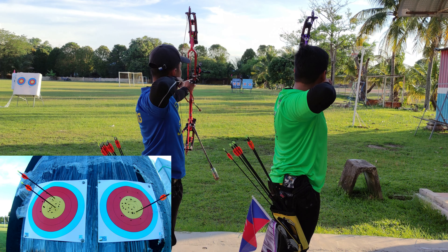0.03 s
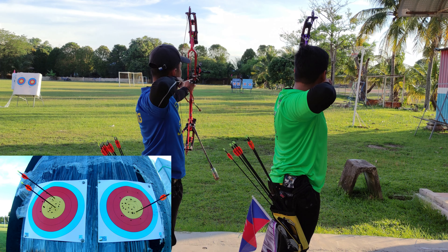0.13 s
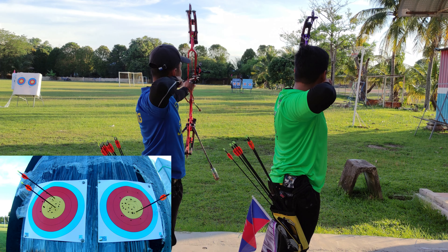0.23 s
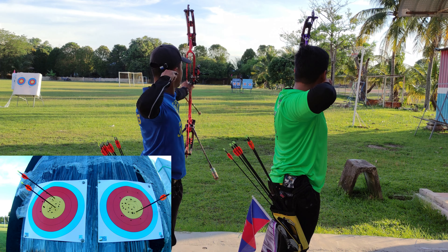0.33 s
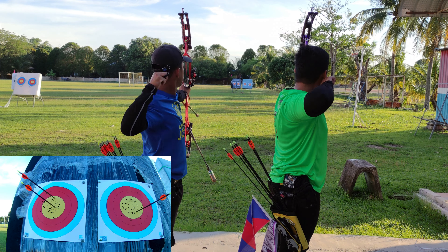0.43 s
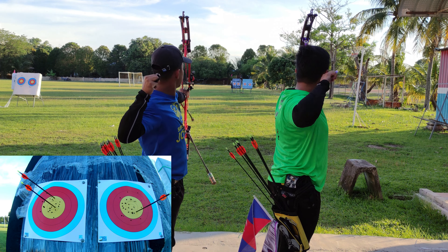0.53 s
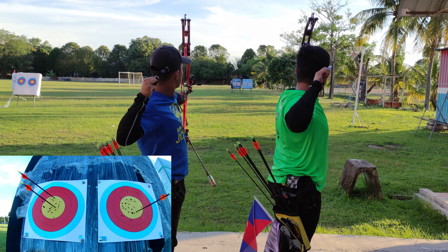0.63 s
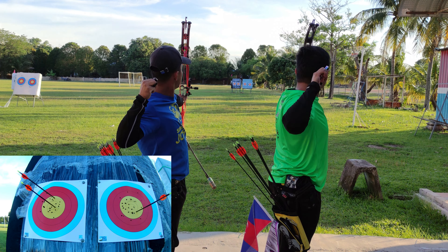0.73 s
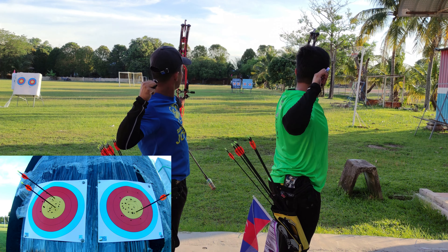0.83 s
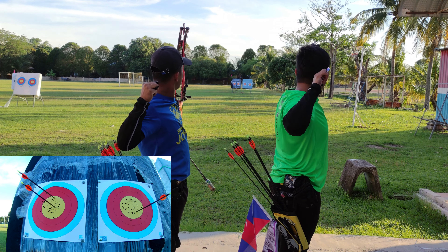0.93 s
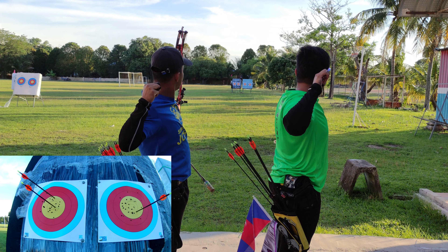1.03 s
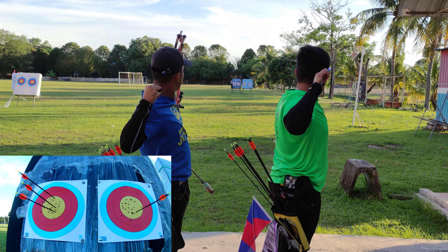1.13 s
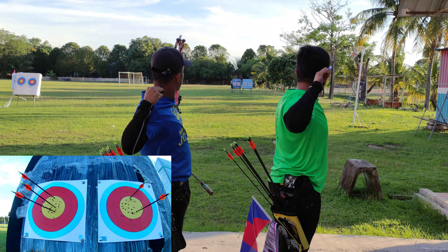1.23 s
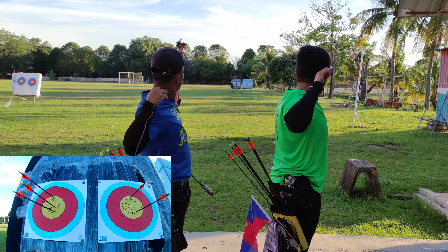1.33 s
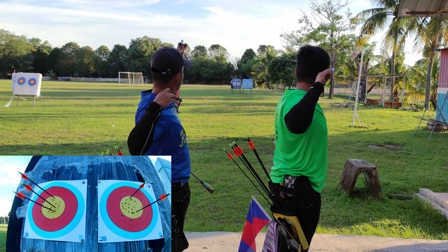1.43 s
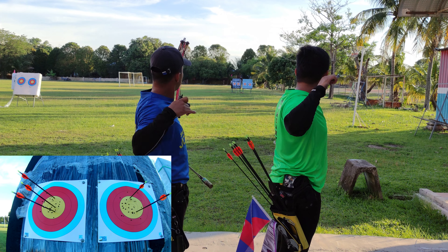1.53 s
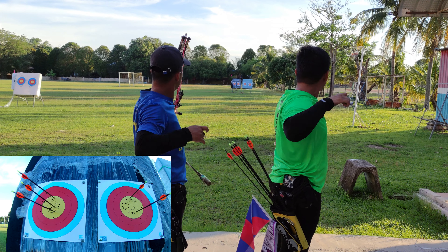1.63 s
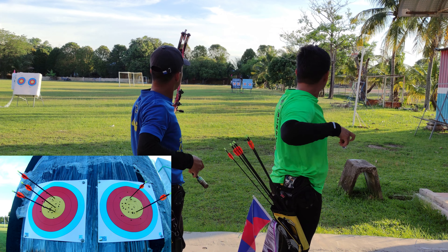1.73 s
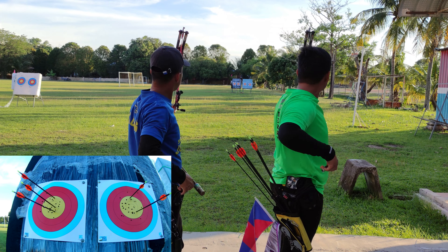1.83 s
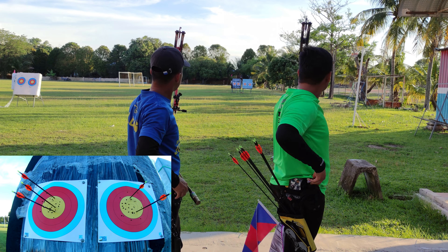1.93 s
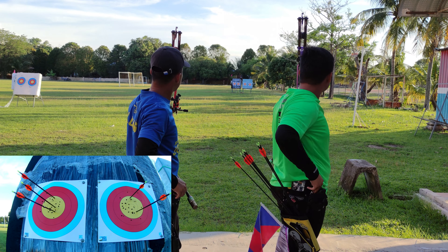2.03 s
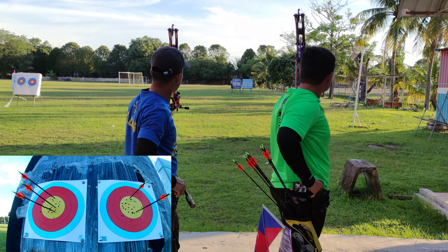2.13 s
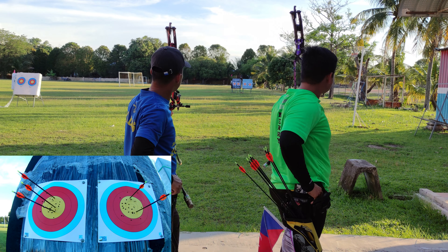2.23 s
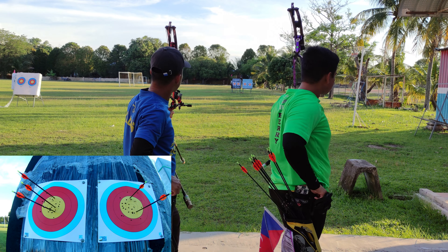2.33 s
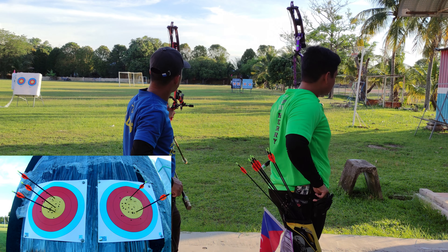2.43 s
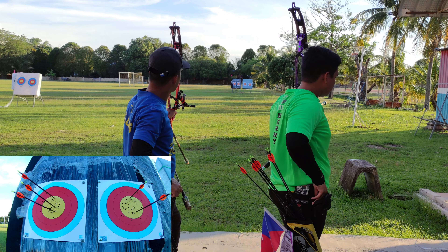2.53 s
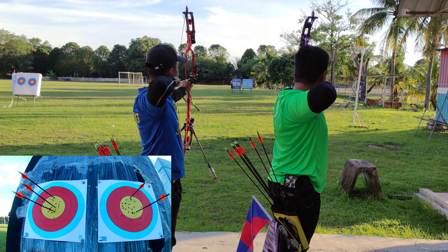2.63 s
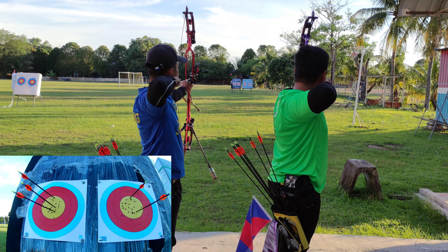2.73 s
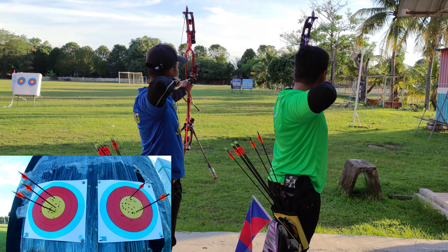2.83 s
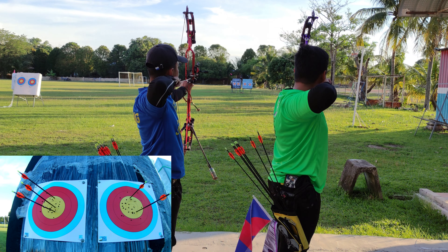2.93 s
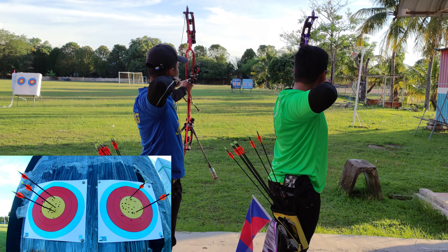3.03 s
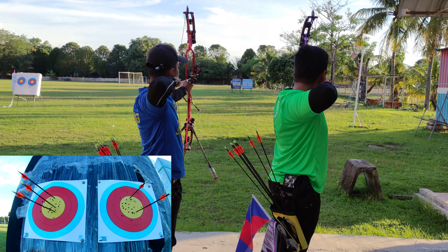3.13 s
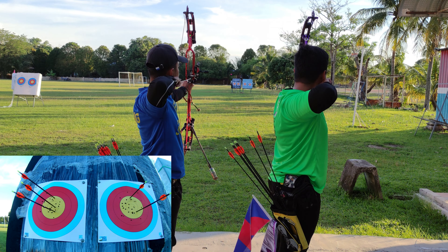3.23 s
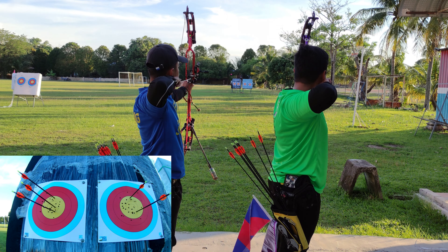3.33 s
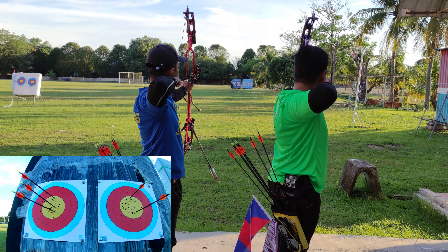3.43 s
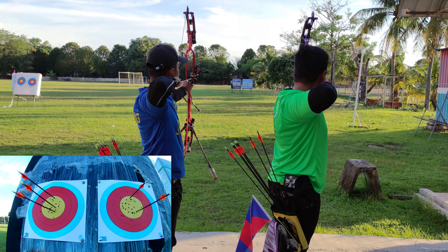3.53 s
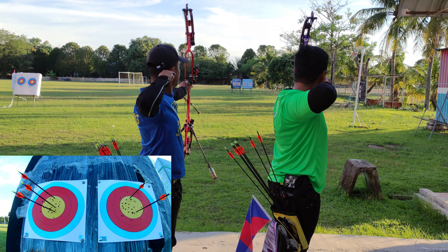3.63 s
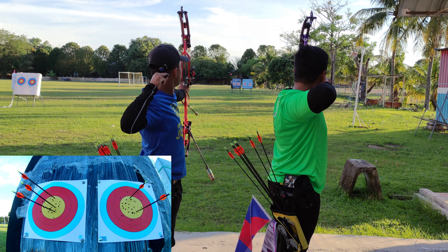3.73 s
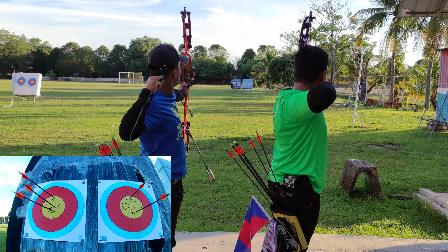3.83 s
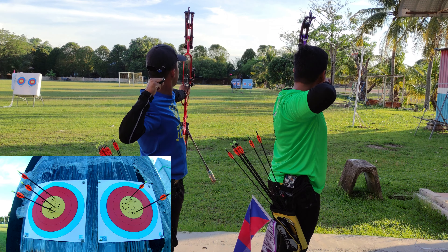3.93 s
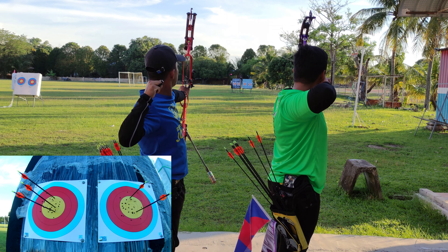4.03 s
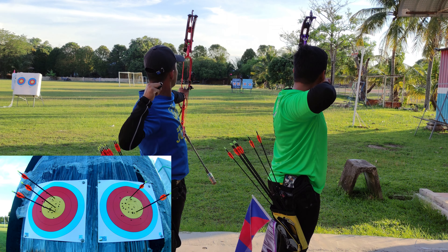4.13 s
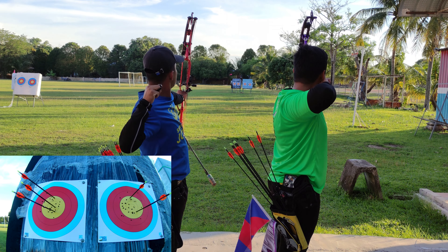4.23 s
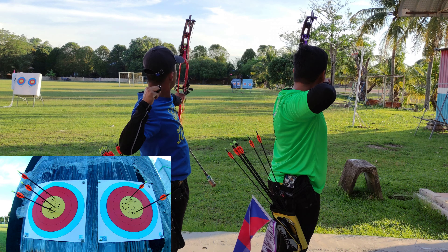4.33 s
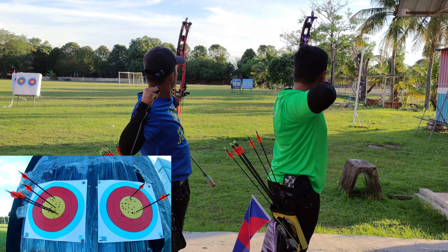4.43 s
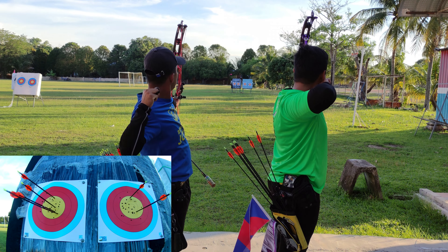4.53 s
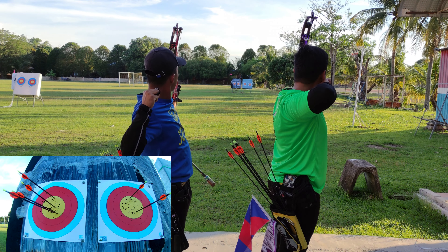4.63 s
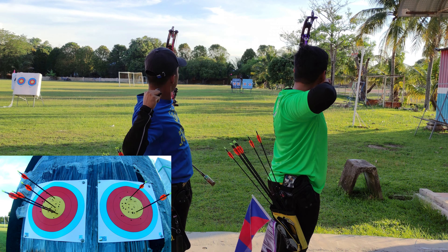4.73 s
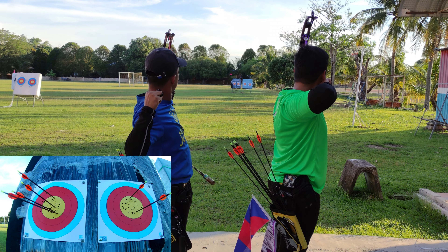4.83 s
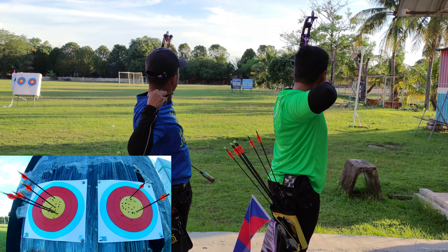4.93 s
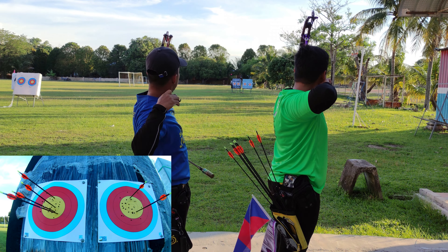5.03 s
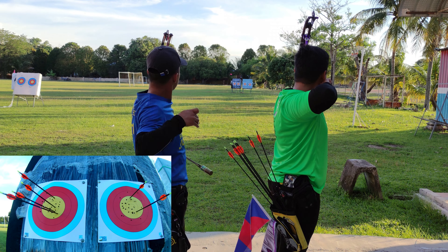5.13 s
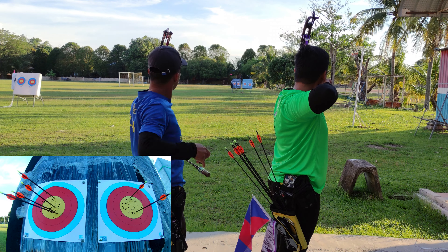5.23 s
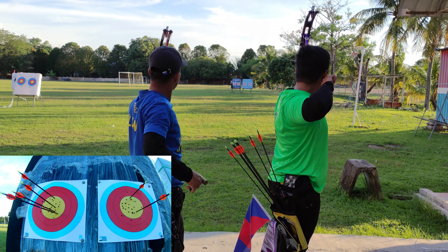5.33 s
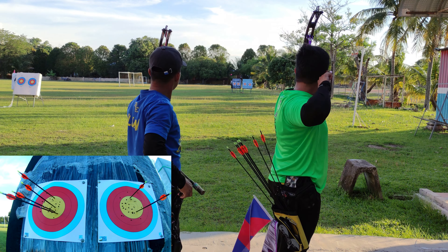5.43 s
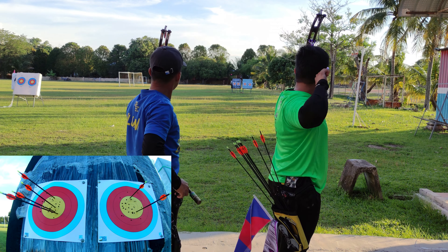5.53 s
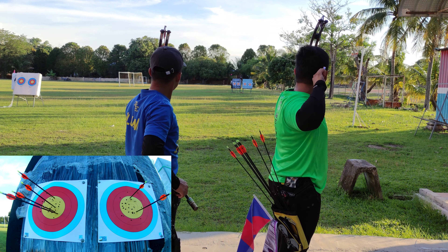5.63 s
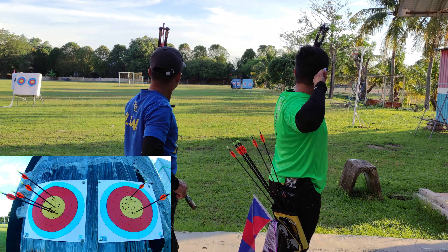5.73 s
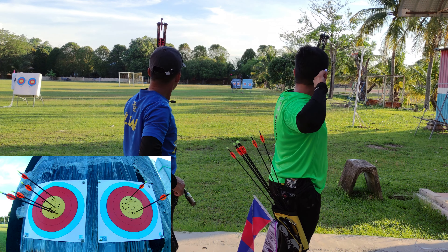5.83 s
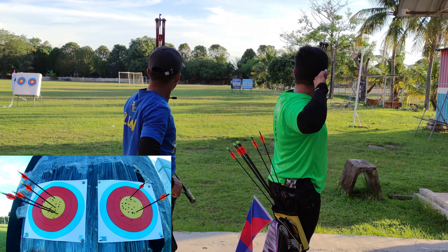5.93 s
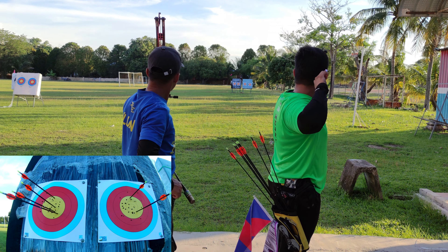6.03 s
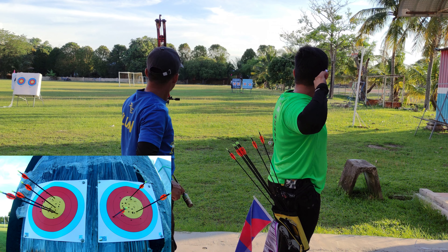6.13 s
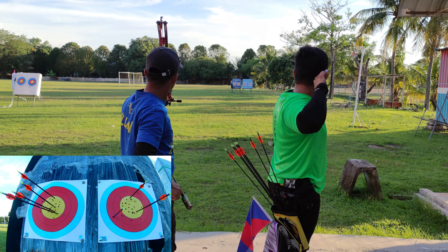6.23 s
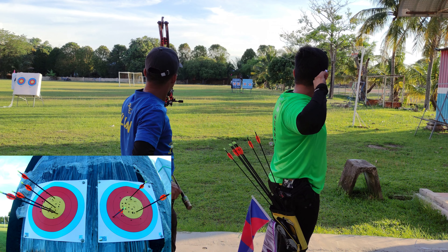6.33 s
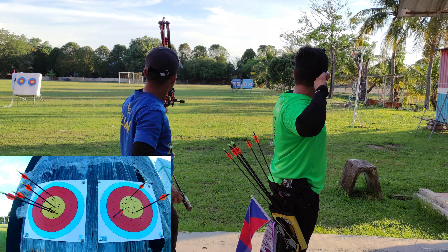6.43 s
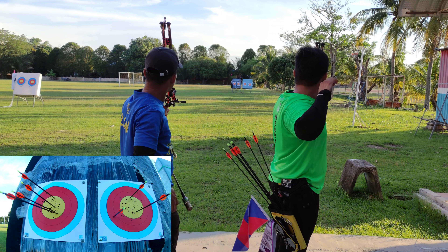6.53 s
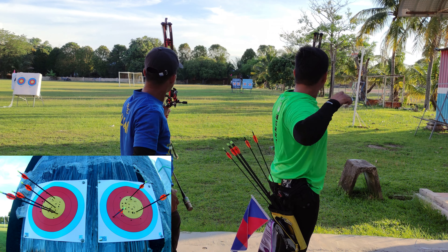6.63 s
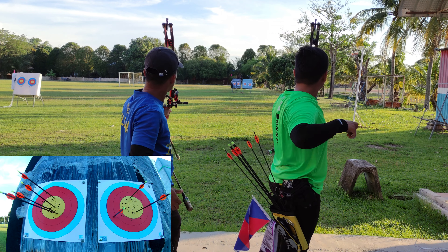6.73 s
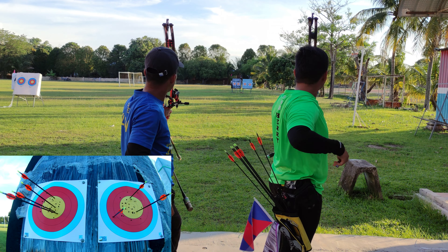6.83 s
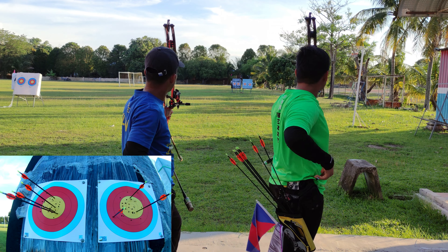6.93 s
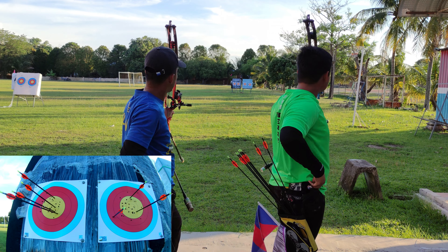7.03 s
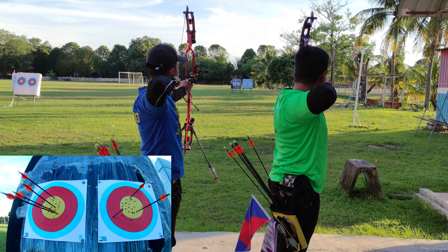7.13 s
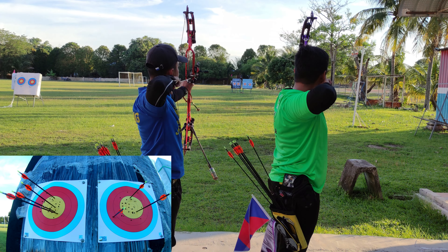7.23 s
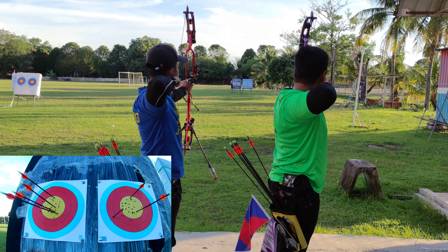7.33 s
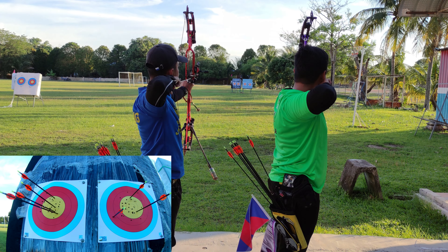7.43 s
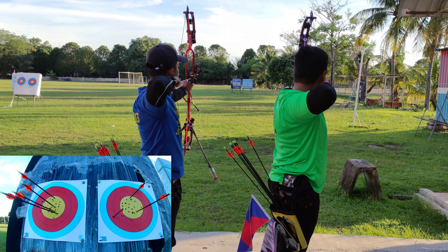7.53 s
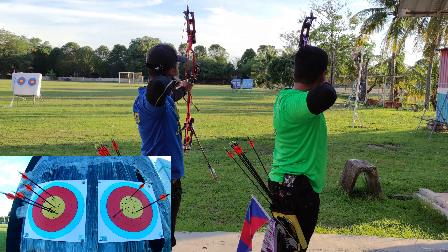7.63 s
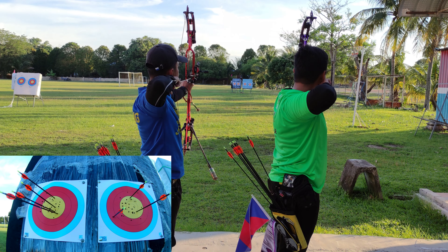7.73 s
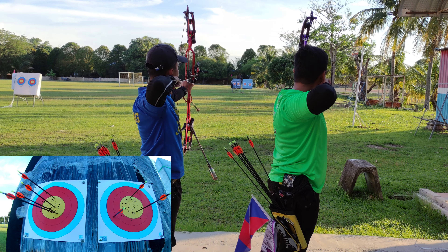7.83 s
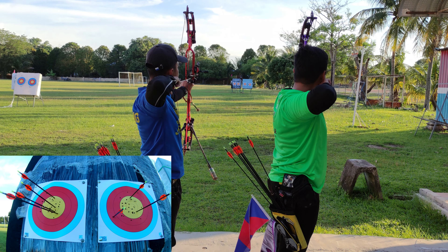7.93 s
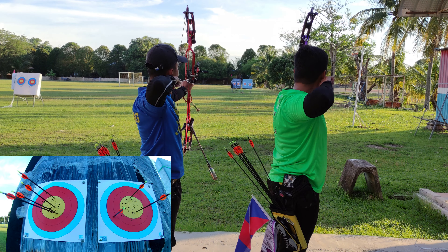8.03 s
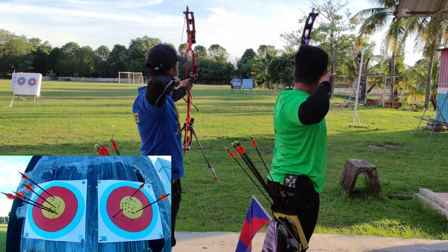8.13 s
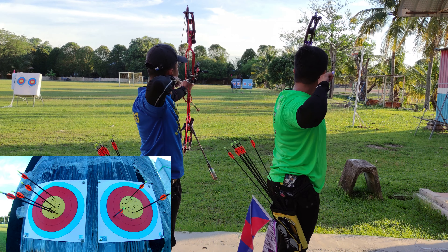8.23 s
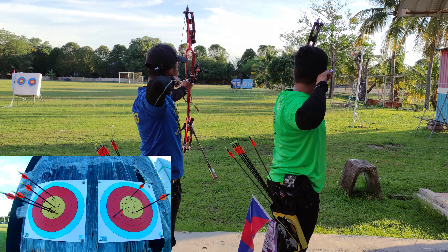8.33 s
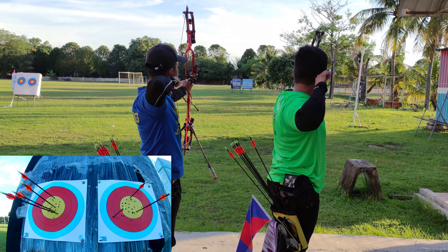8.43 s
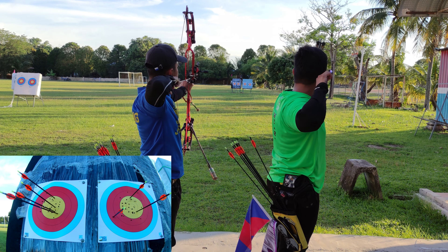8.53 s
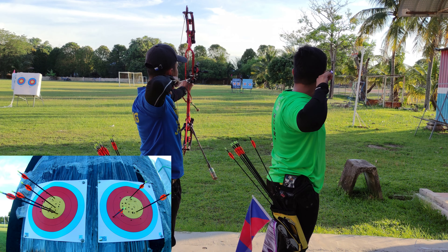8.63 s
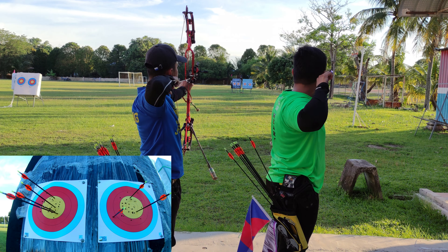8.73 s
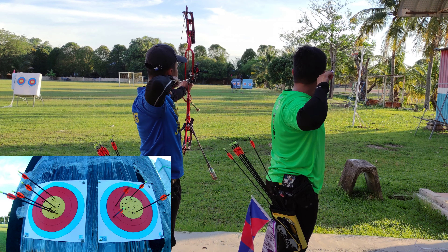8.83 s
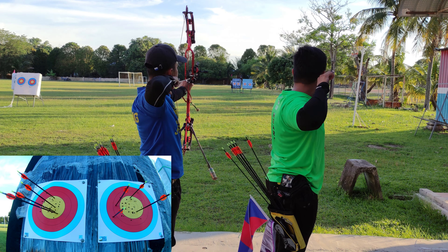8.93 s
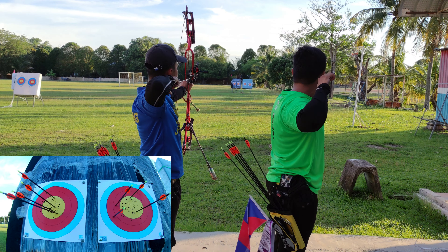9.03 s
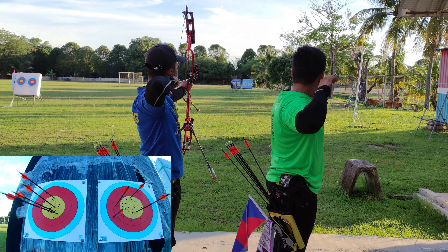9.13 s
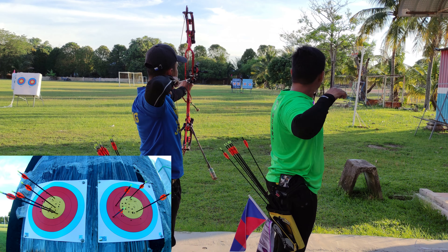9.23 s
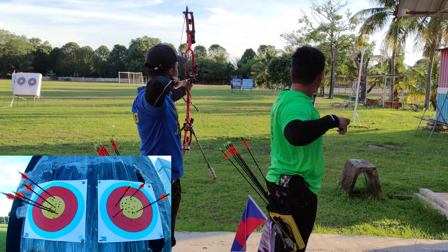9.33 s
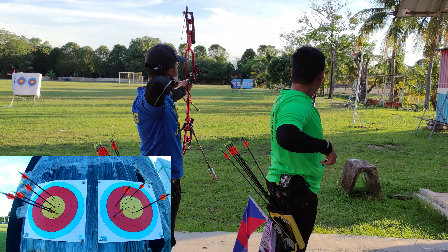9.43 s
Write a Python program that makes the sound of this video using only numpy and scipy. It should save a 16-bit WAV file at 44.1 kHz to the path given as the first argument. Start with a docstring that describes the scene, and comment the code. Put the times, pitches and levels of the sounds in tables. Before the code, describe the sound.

Five arrows leave bows with a snap and thump, each smacking into a target moments later, over faint distant traffic.

```python
"""Two compound bows are shot from under a shelter at the edge of an open field.
Each release is a snap, a hiss of the sliding arrow and a thump as the string excites the bow's modes,
with a bright wash of reverberation from the roof. About 0.75 s later the arrow smacks into the target,
heard from close by and, 55 ms later, thinly from afar. Gear clicks between shots and a sleeve
brushes past; far traffic drones, leaves rustle and insects buzz."""
import sys
import numpy as np
from scipy import signal
from scipy.fft import rfft, irfft
from scipy.io import wavfile

SR = 44100
rng = np.random.default_rng(int(sys.argv[2]) if len(sys.argv) > 2 else 0)


def to_wav(s):
    """Save 16-bit WAV."""
    ch = np.atleast_2d(s).T  # columns
    pcm = np.round(np.clip(ch, -1, 1) * 32767)  # PCM
    wavfile.write(sys.argv[1], SR, pcm.astype(np.int16))


N = 418509
TIME = np.arange(N) / SR

# Levels in all tables are relative; t60 is the time taken to decay by 60 dB.
# bow releases: t/s, bow (0 far, 1 near), then level/dB of snap, slide, thump and wash
SHOTS = [(0.3558, 0, -42, -35.5, -22.5, -35), (0.5128, 1, -27, -37.5, -23.5, -28.5),
         (3.6640, 0, -39, -36.5, -21.5, -35.5), (5.3623, 1, -25, -37, -24, -29),
         (8.0970, 1, -27.5, -37.5, -23.5, -28.5)]
# arrow impacts: t/s, face f/Hz, face level/dB, braking t/s, stand level/dB, butt level/dB, butt tuning,
# crack level/dB, shaft tuning, clatter level/dB, distant tick level/dB, shiver f/Hz
IMPACTS = [(1.1373, 1332, 1, 0.0043, -2, -0.5, 0.9, -16.5, 1.2, -17, -27, 7500),
           (1.25, 1430, -6.5, 0.00401, -3.5, -4, 1.03, -19.5, 1.2, -16, -33, 5380),
           (4.447, 1291, 1.5, .0060, 2.5, -2.5, 1.0, -9, 0.99, -16, -28.5, 4960),
           (6.0974, 1277, -4, 0.00463, -1.5, 0.5, 1.007, -11.5, 1.146, -12.5, -30, 4770),
           (8.8333, 1159, 1, 0.0047, 2.5, 1.5, 0.97, -7.5, 0.917, -19.5, -30, 4230)]
# stereo width and lean of shelter and field: f/Hz, side-mid level/dB, left-right level/dB
SHELTER_IMAGE = [(202.5, -20.5, 1.5), (800, -4.5, -1.5), (1600, -4, -1), (3000, -1, -2.5),
                 (5390, 2.5, -7.5), (8150, 2.5, 6), (10500, -0.5, -2), (14000, 0, -11)]
FIELD_IMAGE = [(30.03, -3, -2.5), (70, -23.5, 0), (200.5, -15, -0.5), (400, -8, 0), (802, -5, 0.5),
               (1400, 0, 0), (4064, -0.5, -2), (13900, 0, 0)]
# spectrum of the leaves and of the late reverberation: f/Hz, level/dB
SOFT_HISS = [(2200, 5), (3500, -0.5), (6500, -6), (9000, -14.5)]


def bows(stroke_s=.0175, loading_s=.0017):
    """Impulse excitation: the release snaps, the arrow slides, the string sets bow and roof ringing."""
    # modes of each bow: f/Hz, level/dB, t60/s
    far_modes = [(245, -3, 0.15), (343, -14, 0.12), (480, -9.5, 0.13), (678, -9, 0.058),
                 (770, -11.5, 0.083), (948, -7, 0.072), (1950, -19, .1)]
    near_modes = [(229, -4.5, 0.16), (339, 1, 0.054), (478, -9.5, 0.12), (568, -1, 0.031), (780, 5, 0.015),
                  (945, -5.5, 0.055), (1184, -6, 0.054), (2310, -26, .08)]
    # spectra of the release aid, the sliding arrow and each bow's wash from the roof: f/Hz, level/dB
    snap = [(1500, -17), (4000, -40), (6000, -3), (7200, 9), (9000, -1.5), (11000, -11), (16000, -13)]
    slide = [(590, -25), (1000, -26), (1630, 7), (2230, 6), (2710, 6.5), (4070, 6), (5970, -1), (7790, 3),
             (8650, 2), (9380, -1), (16000, -26)]
    far_wash = [(180, -31), (300, -6.5), (398, -12.5), (565, -5), (828, -9), (961, -10), (1320, -17),
                (2280, -15.5), (3700, -21.5), (4750, -21), (8090, -25.5), (11900, -39), (16000, -38)]
    near_wash = [(120, -32), (200, -3), (273, 0), (373, -12.5), (500, -4), (601, -10), (899, -9.5),
                 (986, -8), (1300, -15.5), (2210, -12.5), (3900, -19), (8120, -18.5), (11900, -31),
                 (14900, -29.5), (16000, -37)]
    # reverberation time of the shelter: f/Hz, t60/s
    shelter_t60 = [(250, .45), (1000, 0.3), (2500, 0.45), (5500, 0.57), (8500, 0.56), (12000, 0.36),
                   (16000, 0.33)]
    out = np.zeros((2, N))
    for s, near, snap_db, slide_db, thump_db, wash_db in SHOTS:
        modes, wash = (near_modes, near_wash) if near else (far_modes, far_wash)
        thump = ring(modes)
        thump *= 1 - np.exp(-TIME[:len(thump)] / loading_s)  # the limbs take up the blow
        add(out, s, snap_db, burst(snap, t60=.018, rise_s=.0011, stereo=SHELTER_IMAGE))
        add(out, s, slide_db, burst(slide, t60=.23, rise_s=.0062, stereo=SHELTER_IMAGE))
        add(out, s + stroke_s, thump_db, thump)
        add(out, s + stroke_s, wash_db, burst(wash, shelter_t60, rise_s=.0029, stereo=SHELTER_IMAGE))
    return out


def late_wash():
    """Late reverberation: a faint hiss lingers around the shelter after each release."""
    out = np.zeros((2, N))
    for s, *_, wash_db in SHOTS:
        add(out, s, wash_db - 21.5, burst(SOFT_HISS, t60=1, rise_s=.069, stereo=FIELD_IMAGE))
    return out


def target(lowest_hz=45, contact_hz=8500):
    """Momentum transfer: the point cracks through the face, the butt thuds and its stand booms."""
    # modes of the arrow shaft, the target butt and its stand: f/Hz, level/dB, t60/s
    shaft_modes = [(2150, -11.5, 0.037), (2720, -16, 0.022), (3510, -14.5, 0.014), (4310, -7.5, 0.0076),
                   (5470, -23, .009)]
    butt_modes = [(413, -13, 0.069), (518, -17, .03), (626, -7, 0.043), (837, -11.5, 0.032),
                  (929, -8, 0.033), (1144, -13, 0.015), (1790, -8.5, 0.013)]
    stand_modes = [(71.4, -32, 0.091), (108, -24, 0.056), (185.6, -15, .07), (238, -17, 0.097),
                   (279.3, -20, 0.071)]
    # spectra of the point's crack and the stand's clatter: f/Hz, level/dB
    crack = [(2000, 11.5), (4600, 1.5), (6500, -9.5), (9000, -9), (16000, -24)]
    clatter = [(100, -13.5), (400, -2), (900, -2), (1600, -1.5), (2400, -18.5), (3500, -28.5),
               (6000, -42.5), (12000, -66.5)]
    # decay of the clatter: f/Hz, t60/s
    clatter_t60 = [(100, 0.38), (400, 0.1), (1500, 0.057), (3000, 0.068), (10000, 0.03)]
    out = np.zeros((2, N))
    for (s, face_hz, face_db, braking_s, stand_db, butt_db, butt_tuning,
         crack_db, shaft_tuning, clatter_db, *_) in IMPACTS:
        add(out, s, crack_db, ring(shaft_modes, shaft_tuning))
        add(out, s, crack_db - 10, burst(crack, t60=.012, rise_s=.00016))
        add(out, s, face_db, target_face(face_hz))
        add(out, s, clatter_db, burst(clatter, clatter_t60, rise_s=.00088))
        # the butt starts to move halfway through the braking; the stand is shoved as the shaft stops
        add(out, s + braking_s / 2, butt_db, ring(butt_modes, butt_tuning))
        add(out, s + braking_s, stand_db, ring(stand_modes))
        add(out, s + braking_s, -.5, ring([(380, 0, .0058)]))
    # the hits carry no deep bass, and the soft foam rounds off every edge
    passband = signal.butter(2, [lowest_hz, contact_hz], "band", fs=SR, output="sos")
    return signal.sosfilt(passband, out + 1e-18)


def target_face(centre_hz, stretch=.35, relax_s=.0038, t60=.025):
    """Tension modulation: the point pulls the face taut, so its pitch falls as it relaxes."""
    t = TIME[:8192]
    hz = centre_hz * (1 + stretch * (2 * np.exp(-t / relax_s) - 1))
    phase = 2 * np.pi * np.cumsum(hz) / SR
    return from_db(-60 * t / t60) * np.sin(phase)


def distant_hits(delay_s=.0555):
    """Propagation delay: each hit is also heard from afar, a thin tick with a soft, shivering tail."""
    # spectra of the tick and of its tail: f/Hz, level/dB
    tick = [(700, 7), (1600, 10), (2400, 4.5), (3200, -22), (4600, -2.5), (8000, -7), (11000, -26),
            (16000, -28)]
    tail = [(200, 3), (900, 3), (2200, 0), (3100, -16), (4600, -8), (7000, -18), (12000, -33)]
    out = np.zeros((2, N))
    for s, *_, tick_db, shiver_hz in IMPACTS:
        shiver = [(shiver_hz / 1.07, -12), (shiver_hz, 0), (shiver_hz * .94, -12)]  # of the shaft
        arrival_s = s + delay_s
        add(out, arrival_s, tick_db, burst(tick, t60=.009, rise_s=.0001, stereo=FIELD_IMAGE))
        add(out, arrival_s, tick_db - 4.5, burst(shiver, t60=.009, rise_s=.0001, stereo=FIELD_IMAGE))
        add(out, arrival_s, -49, burst(tail, t60=.72, rise_s=.0022, stereo=FIELD_IMAGE))
        add(out, arrival_s, -60, burst(shiver, t60=.46, rise_s=.016, stereo=FIELD_IMAGE))
    return out


def gear():
    """Free vibration: arrows and fittings touch, clink and tick, and the shelter reverberates."""
    # modes of the gear: f/Hz, level/dB, t60/s
    modes = [(2063, 0.5, 0.052), (2370, -3.5, 0.13), (2505, 0, 0.037), (2906, -7.5, 0.069),
             (3240, -24, .06), (3800, -26, 0.17), (6380, -43, 0.11)]
    # spectra of its knock and tick: f/Hz, level/dB
    knock = [(1300, -12), (1800, -7), (1990, -8.5), (2150, -6), (2380, -9.5), (2600, -8), (2800, -4),
             (3050, -19), (3350, -8), (3500, -22), (3660, -8.5), (3950, -16.5), (5000, -27)]
    tick = [(4000, 2), (6000, -3.5), (8200, 5.5), (10000, -13), (16000, -19)]
    out = np.zeros((2, N))
    for s, knock_db, tick_db in touches():
        clink = np.array([ring(modes, spread_db=0, detune=.0078, size=8192) for side in range(2)])
        add(out, s, knock_db - 2.5, clink)
        for spectrum, db in (knock, knock_db - 1.5), (tick, tick_db - .5):
            add(out, s, db, burst(spectrum, t60=.05, rise_s=.00067, stereo=SHELTER_IMAGE, size=4096))
            tail = burst(spectrum, t60=.48, rise_s=.0065, stereo=SHELTER_IMAGE, size=16384)
            add(out, s, db - 16, tail)
    return out


def touches(loss_db=5):
    """Inelastic rebound: each knock repeats more weakly; fingers in the quiver add faint touches."""
    # knocks as the bows are lowered and reloaded: t/s, knock level/dB, tick level/dB, rebound gap t/s
    knocks = [(2.0346, -43, -44.5, .0025), (2.1663, -49, -57, 0.0031), (2.494, -42, -54, 0.026),
              (5.5992, -47, -49, 0.0085), (6.0134, -53, -63, .002), (6.0264, -50, -58, .002),
              (6.2132, -43, -59, 0.0091), (6.2296, -38.5, -45, 0.0076), (6.511, -37.5, -47, .003),
              (6.6088, -39.5, -46, .0094), (6.6445, -35.5, -40, 0.0091), (9.451, -50.5, -56, .0165)]
    rebounds = [(s + k * gap_s, knock_db - k * loss_db, tick_db - k * loss_db)
                for s, knock_db, tick_db, gap_s in knocks for k in range(3)]
    fumbles = [(s, -52, -63) for s in rng.uniform(2.25, 2.47, size=4)]
    return rebounds + fumbles


def sleeve(start_s=7.097, level_db=-43.5):
    """Friction noise: cloth gives a short, bright swish as a bow is raised."""
    # spectrum of the cloth: f/Hz, level/dB
    swish = [(4500, -5), (6000, -1), (8000, 5), (10000, -10.5), (15000, -23.5)]
    out = np.zeros((2, N))
    add(out, start_s, level_db, burst(swish, t60=.092, rise_s=.012, stereo=SHELTER_IMAGE))
    return out


def traffic_drones(fading_db=3.5):
    """Sums of partials: a low drone switches pitch and level abruptly twice; another slowly rises."""
    # pitch and level of each drone: t/s, f/Hz, level/dB
    stepping = [(0, 55.8, -51), (2.6, 57.73, -55), (2.8, 74.1, -45), (6.95, 72.84, -57.5),
                (7.2, 62.77, -47), (9.49, 59, -49)]
    rising = [(2.6, 79.7, -79.5), (2.75, 80.06, -48), (4.2, 81.8, -48.5), (6.6, 86, -44.5),
              (7.05, 86.6, -47.5), (7.25, 86.3, -76.5)]
    # their partials: frequency multiple, level/dB
    stepping_orders = [(0.999, -2.5), (1.999, -8.5), (3.45, -8.5)]
    rising_orders = [(1, -2), (1.5, -0.5), (2.5, -13.5), (3, -16.5), (4, -21.5), (5, -17), (6, -16),
                     (7, -15.5)]
    out = np.zeros(N)
    for contour, orders, wobble in (stepping, stepping_orders, .018), (rising, rising_orders, .00322):
        hz, db = in_time(contour)
        phase = 2 * np.pi * np.cumsum(hz * (1 + wobble * drift(13))) / SR
        for order, order_db in orders:  # each partial fades in and out on the way over the field
            out += from_db(db + order_db + fading_db * drift(7.3)) * np.sin(order * phase)
    return out


def field():
    """Incoherent sources add: far traffic rumbles and swishes under faint leaves and hissing air."""
    # spectra of traffic rumble, tyres and open air: f/Hz, level/dB
    rumble_spectrum = [(12, -45.5), (20, -9.5), (32, -6.5), (61, -4), (82, 0), (113, -3), (183, -9.5),
                       (229, -11.5), (293, -19.5), (450, -26), (580, -54.5), (990, -120)]
    tyre_spectrum = [(160, -35.5), (280, -4), (323, -2.5), (372, -10.5), (400, -7), (434, -2.5), (566, 1),
                     (1120, 2), (1980, -16), (3200, -25.5), (4160, -51), (7040, -120)]
    air_spectrum = [(2500, -6.5), (4000, -6), (7000, -8), (9500, -5.5), (16000, -4.5)]
    # envelopes of rumble, tyres and leaves: t/s, level/dB
    rumble_level = [(0, -43.5), (2.5, -43), (3.0, -42), (6.7, -44), (7.5, -45.5), (9.49, -45.5)]
    tyre_level = [(0, -49.5), (2.58, -48), (2.75, -51.5), (3.1, -53), (6.9, -53), (7.3, -57.5), (9.49, -58)]
    leaves_level = [(0, -69.5), (1.1, -65.5), (2.5, -65), (2.9, -69.5), (6.3, -67.5), (7.4, -69.5),
                    (9.49, -69.5)]
    rumble = from_db(in_time(rumble_level)[0] + 1.05 * drift(9.7)) * noise(rumble_spectrum, FIELD_IMAGE)
    tyres = from_db(in_time(tyre_level)[0] + .5 + .5 * drift(6.3)) * noise(tyre_spectrum, FIELD_IMAGE)
    leaves = from_db(in_time(leaves_level)[0] - .5) * noise(SOFT_HISS, FIELD_IMAGE)
    air = from_db(-75.5) * noise(air_spectrum, FIELD_IMAGE)
    return rumble + tyres + leaves + air


def insects(rest_db=-76.5, swell_s=.17, sway_hz=110):
    """Modulated narrow-band noise: a buzz wavers in the grass at left; a chirr throbs in the trees."""
    # swells of the buzz above rest, and envelope of the chirr: t/s, level/dB
    swells = [(1.15, 5), (1.95, 4.3), (3.48, 3.2), (4.62, 4), (7.62, 5.7), (8.9, 5.5)]
    chirr_level = [(0, -75), (1.2, -71), (2.8, -83), (7.0, -84), (9.49, -73)]
    buzz_db = rest_db + sum(db * np.exp(-((TIME - s) / swell_s) ** 2) for s, db in swells)
    chirr_db = in_time(chirr_level)[0] - 3
    buzz = noise([(7200, -21), (7850, -2), (8100, -3.5), (8500, -7), (9100, -23)],
                 stereo=[(7020, -1, 14), (8900, -1.3, 5)])
    sway_cycles = np.cumsum(sway_hz * drift(4)) / SR
    buzz = np.real(signal.hilbert(buzz) * np.exp(2j * np.pi * sway_cycles))  # the pitch sways slowly
    chirr = noise([(5300, -13), (6000, -4), (6900, 1), (7600, -2.5)], FIELD_IMAGE)
    waver_db, throb_db = 1.8 * drift(14), 2.5 * drift(30)
    return from_db(buzz_db + waver_db) * buzz + from_db(chirr_db + throb_db) * chirr


def ring(modes, tuning=1, spread_db=1, detune=.005, size=16384):
    """Modal superposition: damped sines whose strength and pitch vary slightly from blow to blow."""
    t = TIME[:size]
    hz, db, t60 = np.transpose(modes)[:, :, None]
    strength, offset = rng.standard_normal((2, len(modes), 1))
    sign = (-1) ** np.arange(len(modes))[:, None]
    fade = from_db(db + spread_db * strength - 60 * t / t60)
    return np.sum(sign * fade * np.sin(2 * np.pi * hz * (tuning + detune * offset) * t), axis=0)


def burst(spectrum, t60, rise_s, stereo=None, size=32768):
    """Exponential decay: noise swells and dies; t60 is one time or a table of f/Hz, t60/s."""
    t, source = TIME[:size], noise(spectrum, stereo, size)
    swell = 1 - np.exp(-t / rise_s)
    if np.isscalar(t60):
        return source * swell * from_db(-60 * t / t60)
    centres_hz, decays_s = np.transpose(t60)
    bins, out = rfft(source), 0
    for share, decay_s in zip(np.eye(len(t60)), decays_s):
        band = np.interp(np.log(bin_hz(size)), np.log(centres_hz), share)
        out += irfft(bins * band, size) * from_db(-60 * t / decay_s)
    return out * swell


def noise(spectrum, stereo=None, size=N):
    """Spectral shaping: noise of mid rms 1, falling steeply beyond its table; mono by default."""
    hz = bin_hz(size)
    outside = np.maximum(1, np.maximum(spectrum[0][0] / hz, hz / spectrum[-1][0]))
    colour = from_db(at_hz(spectrum, hz)[0]) / outside ** 4
    mid, side = rfft(rng.standard_normal((2, size))) * colour
    mid_rms = np.std(irfft(mid, size))
    if stereo is None:
        return irfft(mid, size)[None] / mid_rms
    side_db, lean_db = at_hz(stereo, hz)
    sign = np.array([[1], [-1]])
    left_right = (mid + sign * side * from_db(side_db)) * from_db(sign * lean_db / 2)
    return irfft(left_right, size) / mid_rms


def drift(rate_hz):
    """Random fluctuation: straight lines between standard normal values."""
    knots = rng.standard_normal(400)
    return np.interp(TIME * rate_hz, np.arange(len(knots)), knots)


def from_db(db):
    """Level to amplitude ratio."""
    return 10 ** (np.asarray(db) / 20)


def bin_hz(size):
    """Fourier bin frequencies, at least 1 Hz."""
    return np.maximum(np.arange(size // 2 + 1) * SR / size, 1)


def in_time(rows):
    """Linear interpolation of each column over time."""
    s, *columns = np.transpose(rows)
    return [np.interp(TIME, s, column) for column in columns]


def at_hz(rows, hz):
    """Interpolation of each column over log frequency."""
    f, *columns = np.transpose(rows)
    return [np.interp(np.log(hz), np.log(f), column) for column in columns]


def add(out, s, db, sound):
    """Superposition: mix a sound in at time s with gain db."""
    start = round(s * SR)
    out[:, start:start + sound.shape[-1]] += from_db(db) * sound[..., :N - start]


def scene():
    """Linear superposition of shots, hits, handling and the field."""
    drones = traffic_drones()
    archery = bows() + late_wash() + target() + distant_hits() + gear() + sleeve()
    return archery + drones + field() + insects()


def record(dry, stopband_hz=16686):
    """Saturation rounds off the loudest smacks; a steep low-pass removes the top treble."""
    clipped = dry / (1 + dry ** 6) ** (1 / 6)
    return signal.sosfilt(signal.cheby2(14, 60, stopband_hz, fs=SR, output="sos"), clipped)


dry = scene()
out = record(dry)
to_wav(out)
```